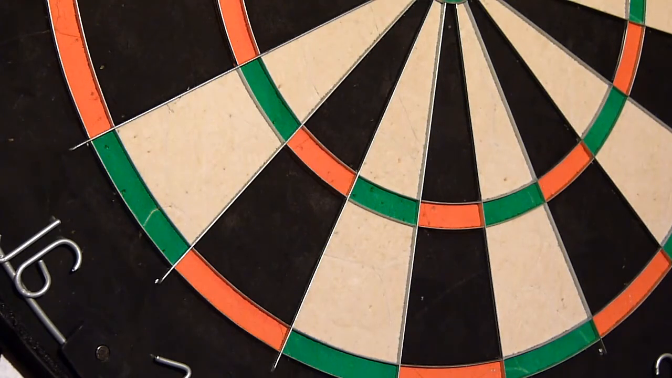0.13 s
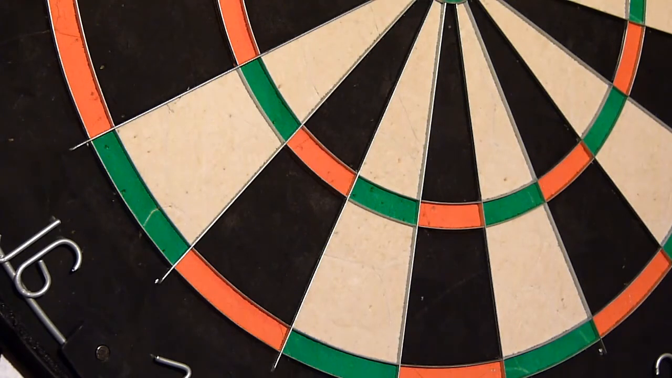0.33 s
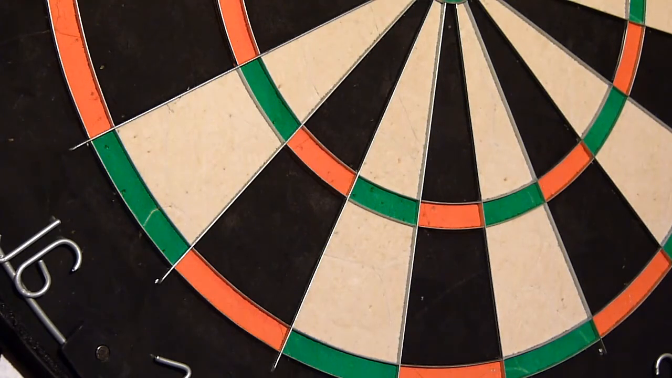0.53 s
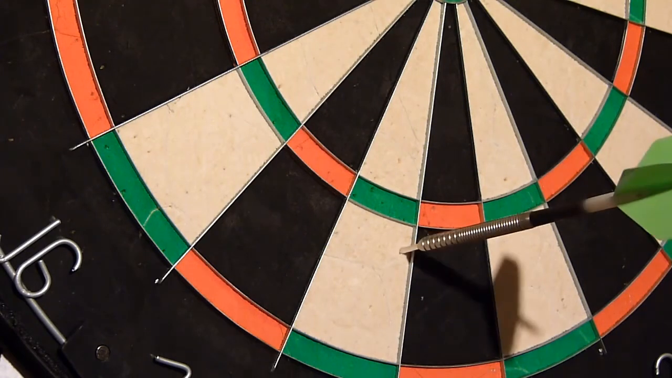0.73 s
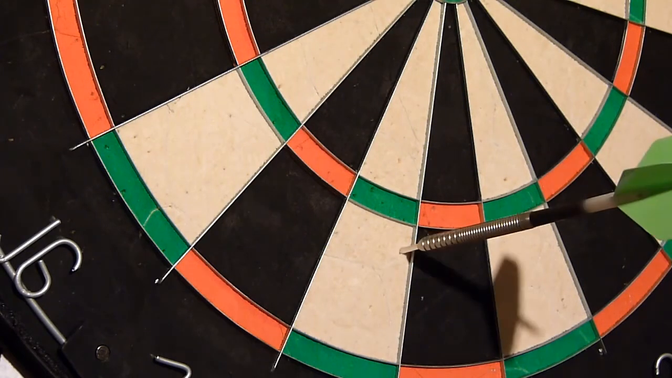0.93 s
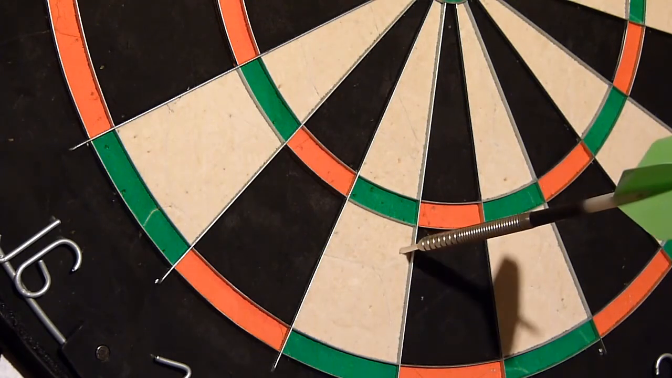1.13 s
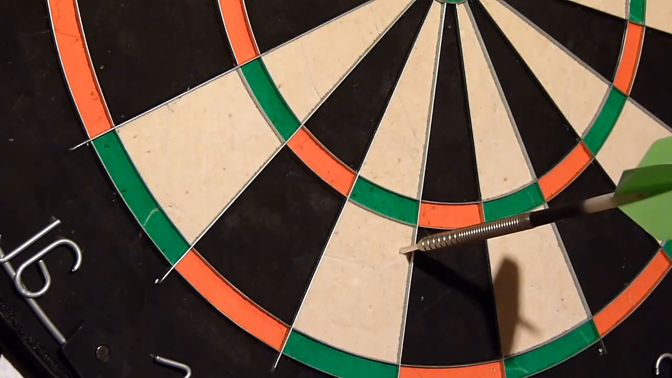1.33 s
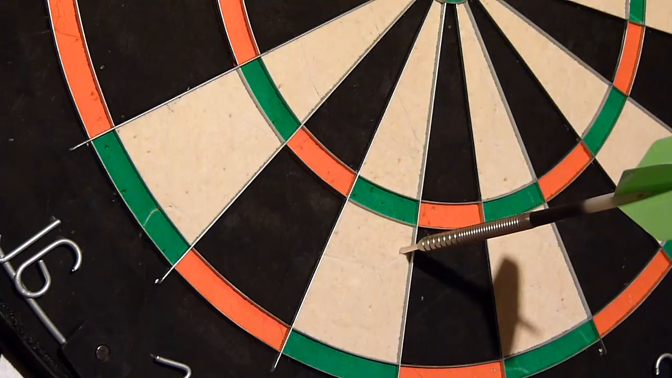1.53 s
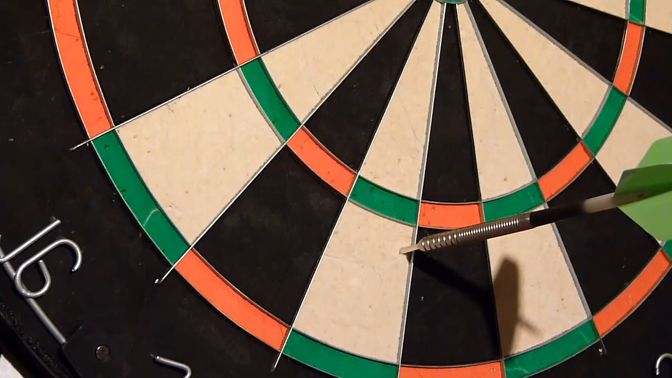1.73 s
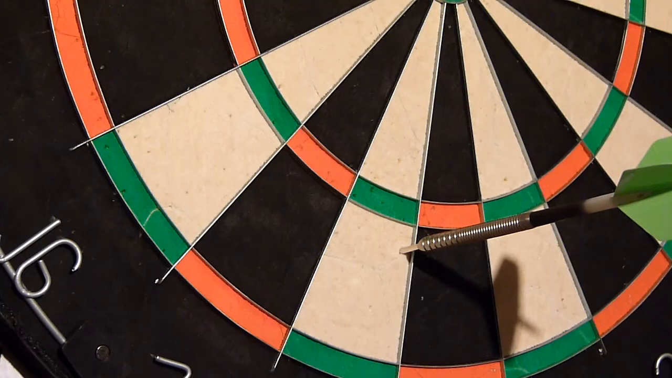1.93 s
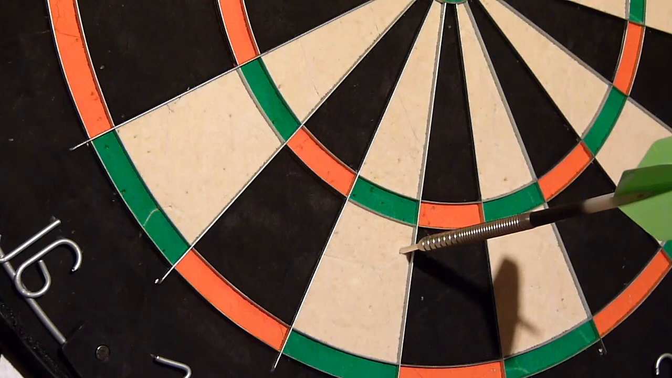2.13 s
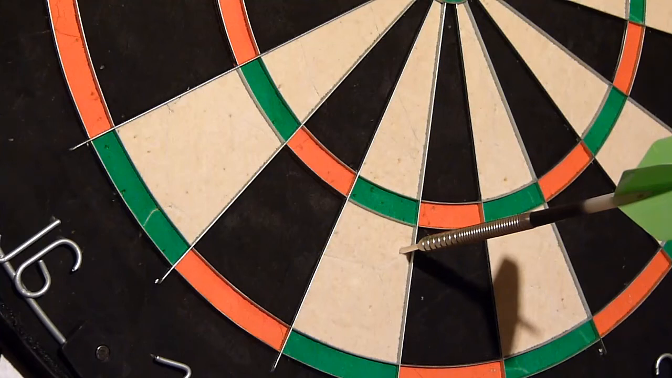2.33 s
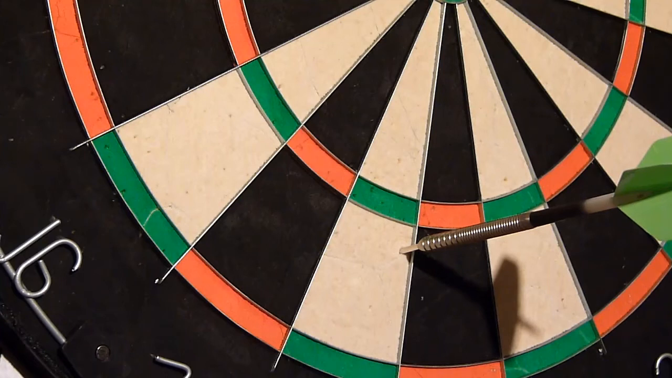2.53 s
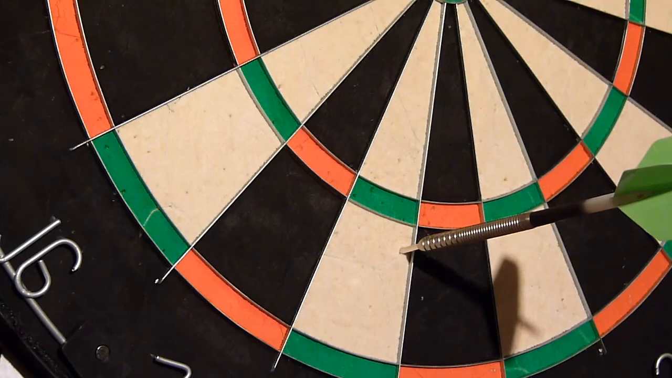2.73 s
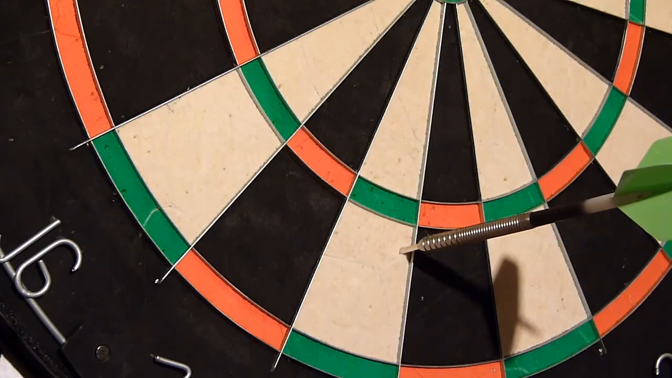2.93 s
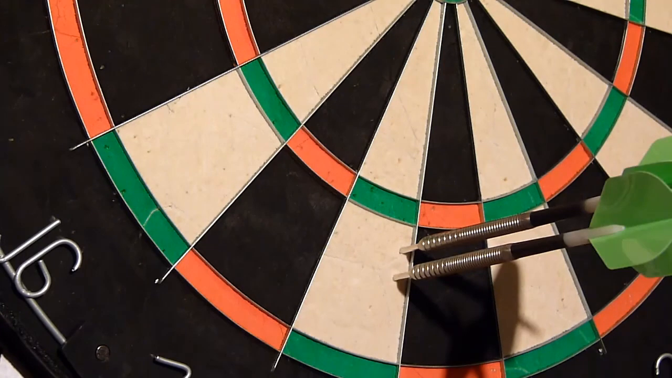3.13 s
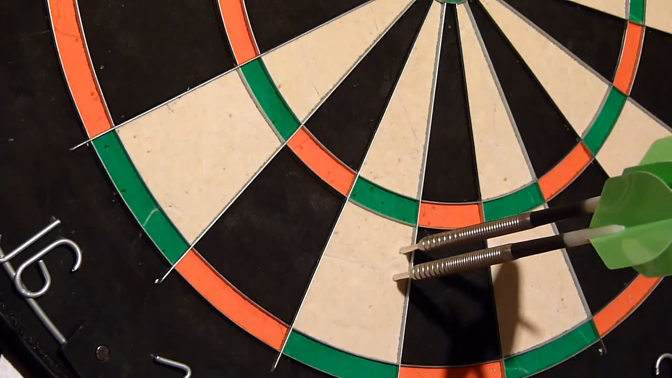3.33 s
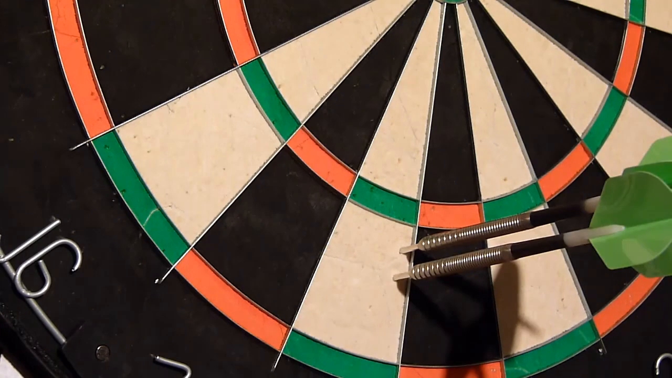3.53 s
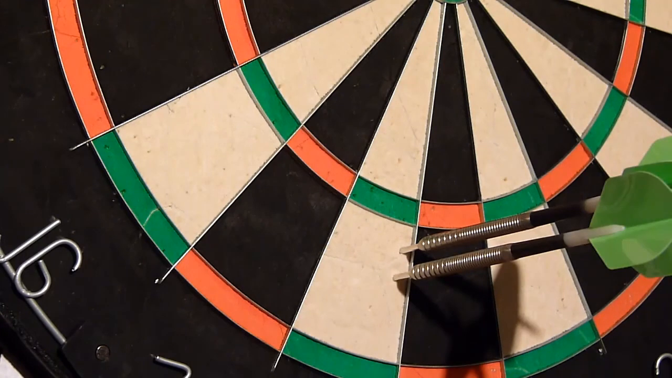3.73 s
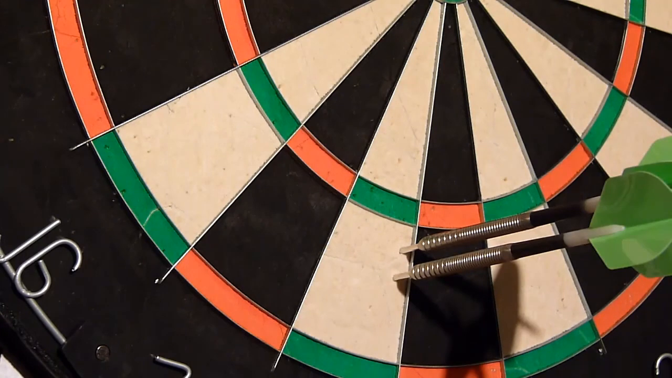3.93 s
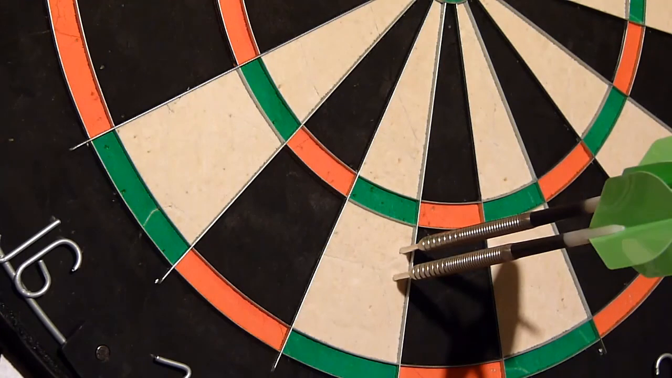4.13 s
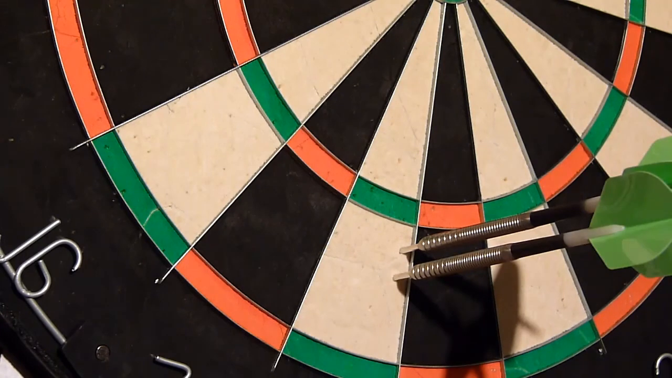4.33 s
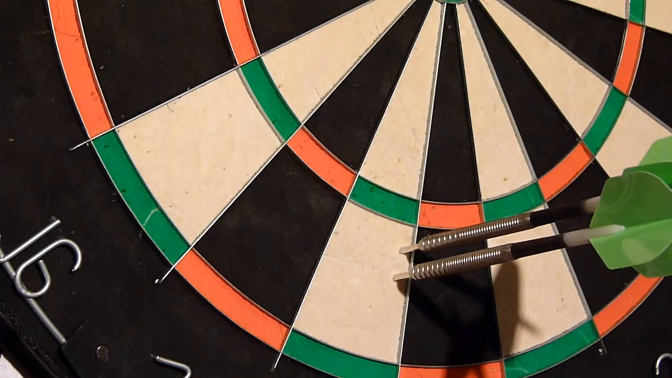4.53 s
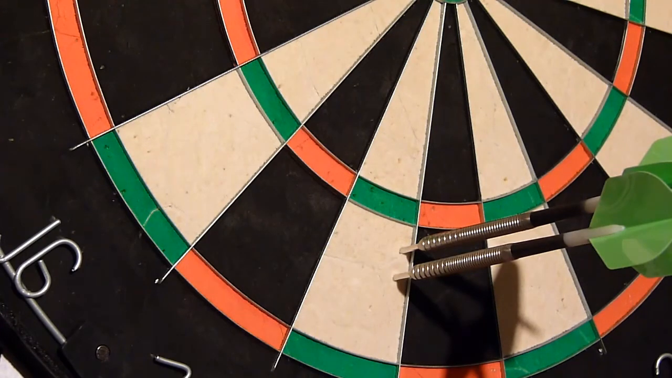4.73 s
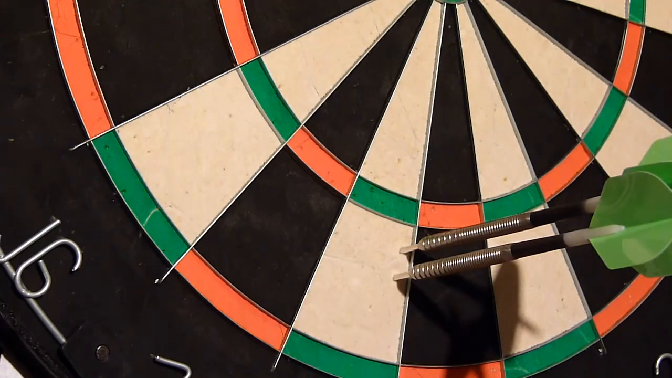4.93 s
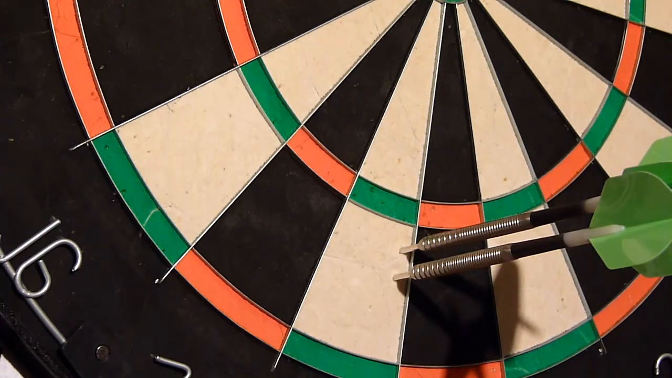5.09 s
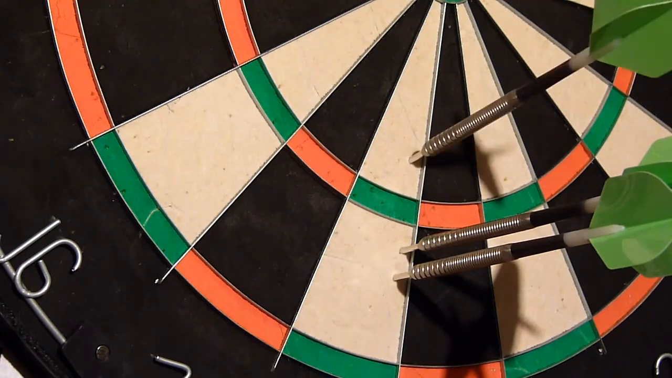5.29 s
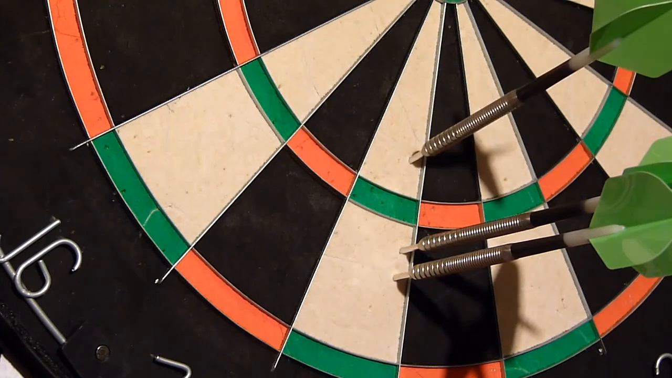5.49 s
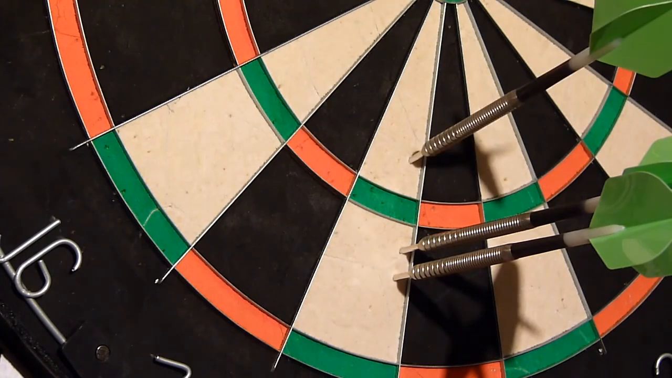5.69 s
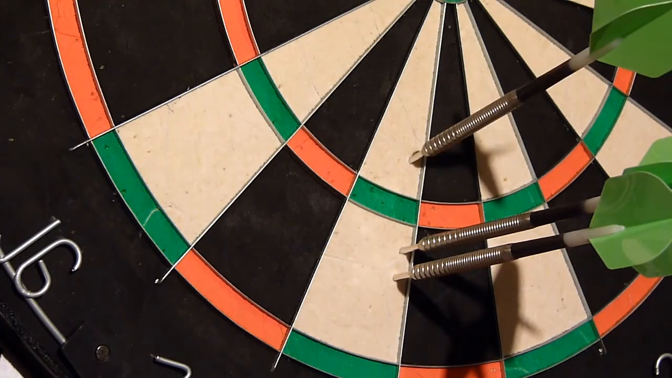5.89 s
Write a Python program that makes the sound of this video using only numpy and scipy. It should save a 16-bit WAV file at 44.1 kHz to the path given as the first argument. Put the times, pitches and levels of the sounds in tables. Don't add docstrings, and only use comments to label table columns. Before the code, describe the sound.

A quiet indoor room with a soft low fan hum. A faint flick precedes a loud, dry dart thud; a long pause follows, then a second dart scrapes the first with a bright metal clack and duller thud. The third hits sharply and cleanly. Behind, the thrower's clothes rustle, spare darts click, and a heel knocks and scuffs at the end. Close stereo, short room reverberation.

```python
import sys
import numpy as np
from scipy import signal
from scipy.fft import rfft, irfft
from scipy.io import wavfile

SR = 44100
rng = np.random.default_rng(int(sys.argv[2]) if len(sys.argv) > 2 else 0)


def file_out(sig):
    cols = np.atleast_2d(sig).T
    lim = np.clip(cols, -1, 1)
    pcm = np.round(lim * 32767).astype(np.int16)
    wavfile.write(sys.argv[1], SR, pcm)


def volts_from_decibels(level):
    exponent = np.asarray(level, float) / 20
    return 10 ** exponent


N = 262483

# f/Hz, level/dB per Hz
AIR = [(15, -63.5), (25, -38), (87, -22.5), (114, -13), (166, -10), (180, -14.5), (200, -1), (270, -9),
       (427, -6.5), (1070, -14.5), (1330, -16.5), (2610, -25), (11600, -30.5), (14700, -31), (15600, -55)]
# f/Hz, width/Hz, level/dB
FAN = [(200.7, 20, -56.5), (225.3, 13.4, -64), (756.8, 14, -64.5), (1337, 43, -66)]
# f/Hz, level/dB
WHINE = [(120.0, -67.5), (10080, -88.5), (11520, -77), (12958, -82), (14400, -82), (14998, -80)]
# f/Hz, likeness
AIR_LIKENESS = [(60, 0.98), (180, 1), (550, 0.96), (1650, 0.27), (4970, -0.33), (15000, -0.17)]
# top t/s, level/dB
WEIGHT_SHIFTS = [(.46, -69), (.68, -48.5), (1.72, -67), (2.85, -65), (3.14, -52.5), (5.0, -66), (5.32, -53),
                 (5.56, -66), (5.88, -51)]
# f/Hz, likeness
ROOM_LIKENESS = [(60, 1.0), (180, 1.0), (550, 0.97), (1650, 0.61), (4970, 0.19), (15000, 0.0)]
# f/Hz, level/dB, t60/s
ROOM = [(297, -19.5, 0.65), (700, -20, 0.35), (1730, -23.5, 0.31), (4800, -24, 0.35), (9280, -23, 0.27),
        (14000, -21, 0.21)]
# top t/s, level/dB, length/s, grain f/Hz
RUBS = [(0.378, -59, 0.041, 8000), (0.439, -50.5, 0.15, 794), (0.427, -59, 0.14, 6000),
        (0.587, -55, 0.045, 7000), (0.836, -48.5, 0.084, 13100), (1.473, -60.5, 0.16, 14000),
        (1.8, -66, .2, 6000), (2.752, -63.5, 0.12, 7000), (2.826, -56.5, 0.081, 1290),
        (2.907, -64.5, 0.26, 7000), (5.009, -57, 0.085, 7000), (5.051, -47.5, 0.071, 1780),
        (5.404, -50, 0.14, 3000), (5.556, -47.5, 0.048, 902), (5.606, -52.5, .1, 3000),
        (5.669, -43, 0.24, 700), (5.681, -43, 0.16, 3020), (5.786, -49, .13, 8100),
        (5.804, -48.5, 0.13, 1470), (5.919, -45.5, 0.18, 1480), (5.945, -37, 0.034, 6000)]
# low f/Hz, high f/Hz
GRAIN_BANDS = [(200, 1340), (1500, 6100), (4500, 12800)]
# t/s, level/dB, f/Hz, t60/s
TAPS = [(.404, -43, 2500, 0.026), (.415, -50.5, 2740, 0.018), (.452, -36, 496, 0.0075),
        (.503, -51, 5500, 0.014), (.578, -45, 4940, 0.0053), (.58, -42, 6030, 0.0072),
        (1.8, -55, 5300, .01), (1.86, -53, 5200, .01), (2.81, -46.5, 2500, 0.032),
        (5.0372, -36.5, 2560, .03), (5.042, -39, 2400, .015), (5.037, -41, 4800, .015),
        (5.049, -47.5, 4730, .015), (5.05, -44.5, 457, 0.01), (5.067, -45, 2670, .012),
        (5.546, -35, 724, 0.024), (5.552, -28, 544, 0.013), (5.576, -34.5, 470, 0.012),
        (5.62, -36.5, 278, 0.057), (5.668, -41, 330, .06), (5.712, -39.5, 284, 0.047),
        (5.935, -38.5, 375, 0.037), (5.81, -33.5, 2100, .008)]
# t/s, peak level/dB, length/s
FLICKS = [(0.277, -32.5, 0.016), (2.669, -32, 0.011), (4.8964, -30.5, 0.0082), (5.9304, -24, 0.0078)]
# f/Hz, level/dB per Hz
FINGERS = [(880, -42), (1500, -15.5), (2260, -9.5), (3340, -12), (10600, -13.5), (14100, -20), (15500, -30)]
# tip enters t/s, barrel stops t/s
LANDINGS = [
    (.6019, .60596),
    (2.9858, 2.9929),
    (5.2031, 5.20744),
]
# thump level/dB, tip nudge level/dB, knock level/dB
BLOWS = [
    (0.5, -17.5, -4.5),
    (-5, -27.5, -10.5),
    (-1.4, -20, -3.5),
]
# crackle level/dB, crackle length/s, level of its echo/dB
TIPS = [
    (-10, 0.0046, -10.5),
    (-9, 0.011, -24),
    (-16.5, 0.0065, -14),
]
# f/Hz, level/dB per Hz
FIBRES = [(1500, -7.5), (3700, -11.5), (5400, -8.5), (7000, -3.5), (10500, -1), (13000, -3), (16000, -15)]
# f/Hz, level/dB per Hz
CRACKLE_ALL_ROUND = [(880, -35), (1500, -28), (2340, -21.5), (3860, -19), (5300, -2.5), (6550, -14),
                     (10900, -9.5), (14300, -26), (15000, -55)]
# f/Hz, level/dB per Hz
CLACK_ALL_ROUND = [(700, -30.5), (1200, -3.5), (1820, -11.5), (2070, 3.5), (2650, -8.5), (3540, -6),
                   (4300, -5), (5370, -2.5), (9370, -8.5), (10800, -8), (15500, -20.5)]
# f/Hz, level/dB, t60/s
BARREL = [(2100, 0.5, 0.00766), (2500, 0.5, 0.013), (3900, 2, 0.0049), (4800, 1, 0.013),
          (5365, -0.5, 0.021), (6130, -3, .006), (7340, 4, 0.017), (8900, -0.5, 0.0059),
          (10610, 6.5, 0.0066), (12000, -6, 0.0092), (14000, 5, 0.0036)]
# t/s, level/dB, f/Hz, t60/s
DART_RINGS = [(2.9872, -12.5, 2100, 0.0076), (2.988, -42, 2170, 0.36), (2.988, -39, 2260, 0.22),
              (2.9915, -15, 225, .035), (2.99, -30, 1020, .1), (2.988, -18, 4950, .02),
              (5.2075, -46, 920, .12), (.606, -22.5, 920, 0.09), (.606, -29, 1300, 0.14),
              (.606, -22, 690, 0.14), (.606, -34, 1500, 0.082), (5.2075, -28.5, 1320, 0.21)]
# f/Hz, level/dB, t60/s
WALL = [(56.4, -50.5, 0.83), (85.1, -42, 0.623), (87.9, -63, 0.7), (122.7, -46, 0.42), (156.3, -34, 0.39),
        (185, -33.5, 0.63)]
# f/Hz, level/dB, t60/s, polarity of the mode at the microphone
BOARD = [(132.9, -21.4, 0.044, 1), (217.4, -24.1, 0.178, -1), (234.5, -28.1, 0.303, -1),
         (262.0, -8.0, 0.056, -1), (267.3, -21.4, 0.368, -1), (269.6, -21.5, 0.244, 1),
         (282.7, -20.1, 0.266, -1), (285.6, -22.9, 0.312, -1), (288.8, -21.4, 0.276, 1),
         (294.7, -23.1, 0.323, 1), (302.4, -22.8, 0.202, -1), (308.0, -16.6, 0.24, -1),
         (311.6, -25.9, 0.367, 1), (317.7, -11.5, 0.244, 1), (326.5, -6.2, 0.093, -1),
         (337.9, -28.9, 0.286, 1), (341.3, -22.6, 0.296, 1), (348.6, -16.8, 0.229, 1),
         (353.7, -19.9, 0.256, -1), (369.6, -17.1, 0.062, 1), (400.0, -23.7, 0.368, 1),
         (405.7, -25.0, 0.182, 1), (474.8, -27.9, 0.185, 1), (525.3, -28.7, 0.221, 1),
         (656.2, -20.5, 0.14, 1), (725.9, -27.6, 0.245, 1), (751.6, -10.6, 0.015, 1),
         (872.3, -29.4, 0.189, 1)]

CLACK_S = 2.9856


def rms_one(x):
    return x / np.sqrt(np.mean(x ** 2) + 1e-30)


def at_hz(points, hz, axis=1):
    points = np.array(points)
    return np.interp(np.log(hz), np.log(points[:, 0]), points[:, axis])


def colour(x, spectrum):
    gain = volts_from_decibels(at_hz(spectrum, np.fft.rfftfreq(N, 1 / SR) + 1))
    return irfft(rfft(x) * gain, N)


def band(x, low_hz, high_hz):
    return signal.sosfilt(signal.butter(2, [low_hz, high_hz], "band", fs=SR, output="sos"), x)


def high_pass(x, hz):
    return signal.sosfilt(signal.butter(2, hz, "high", fs=SR, output="sos"), x)


def low_pass(x, hz, order):
    return signal.sosfilt(signal.butter(order, hz, fs=SR, output="sos"), x)


def pair(likeness, size):
    mid, side = rfft(rng.standard_normal((2, size)))
    alike = np.clip(at_hz(likeness, np.fft.rfftfreq(size, 1 / SR) + 1), -1, 1)
    common = np.sqrt(.5 + alike / 2) * mid
    opposed = np.sqrt(.5 - alike / 2) * side * [[1], [-1]]
    return irfft(common + opposed, size)


def ring(clicks, hz, t60):
    r = volts_from_decibels(-60 / (t60 * SR))
    w = 2 * np.pi * hz / SR
    return signal.lfilter([0, np.sin(w)], [1, -2 * r * np.cos(w), r * r], clicks + 1e-18)


def strike(times, levels_db):
    clicks = np.zeros(N)
    clicks[np.round(np.array(times) * SR).astype(int)] = volts_from_decibels(levels_db)
    return clicks


def burst(start, level_db, length, per_s, lean):
    size = int(length * SR)
    chance, height, sign = rng.random((3, size))
    grains = (chance < per_s / SR) * -np.log(height + 1e-3) * np.sign(sign - .5)
    swell = np.sin(np.pi * np.linspace(0, 1, size) ** lean)
    out = np.zeros(N)
    out[round(start * SR):][:size] = volts_from_decibels(level_db) * grains * swell
    return out


def weight(t):
    rise, fall = 94.5, 71
    shifts = (volts_from_decibels(db - np.maximum(rise * (s - t), fall * (t - s))) for s, db in WEIGHT_SHIFTS)
    return volts_from_decibels(-79) + sum(shifts)


def air():
    t = np.arange(N) / SR
    out = volts_from_decibels(-51) * rms_one(colour(pair(AIR_LIKENESS, N), AIR))
    for hz, width, db in FAN:
        out = out + volts_from_decibels(db) * rms_one(band(pair(AIR_LIKENESS, N), hz - width / 2, hz + width / 2))
    for hz, db in WHINE:
        out = out + volts_from_decibels(db + 1.0) * np.sin(2 * np.pi * hz * t)
    rumble = rms_one(band(band(rng.standard_normal(N), 28, 93.5), 29, 95))
    return out + volts_from_decibels(-4) * weight(t) * rumble


def room(x):
    size = SR // 2
    t, echoes = np.arange(size) / SR, 0
    white = pair(ROOM_LIKENESS, size), pair(ROOM_LIKENESS, size)
    for k, hz in enumerate(180 * 2 ** np.arange(0, 6.6, .5)):
        fade = volts_from_decibels(at_hz(ROOM, hz) - 60 * t / at_hz(ROOM, hz, axis=2))
        echoes = echoes + fade * band(white[k % 2], hz / 1.19, hz * 1.19)
    onset_s = 0.0024
    echoes = echoes * np.clip(t / onset_s, 0, 1) ** 2
    return signal.fftconvolve(x[None], echoes, axes=1)[:, :N]


def rustle(rough_db):
    t, out = np.arange(N) / SR, np.zeros((2, N))
    rise_share, edge_db = 0.4, 12.5
    swells = []
    for s, db, length, _ in RUBS:
        flank_s = length * np.where(t < s, rise_share, 1 - rise_share)
        swells.append(volts_from_decibels(db - edge_db * ((t - s) / flank_s) ** 2))
    for low_hz, high_hz in GRAIN_BANDS:
        lumps = rms_one(band(rng.standard_normal(N), 24.6, 330))
        grains = rms_one(band(pair(ROOM_LIKENESS, N) * volts_from_decibels(rough_db * lumps), low_hz, high_hz))
        octaves = [np.log2(row[3] / np.sqrt(low_hz * high_hz)) for row in RUBS]
        out += grains * sum(volts_from_decibels(-3 * off ** 2) * swell for off, swell in zip(octaves, swells))
    return out


def taps(rows):
    return sum(ring(strike([s], [db]), hz, t60) for s, db, hz, t60 in rows)


def flicks():
    peels = sum(burst(s, db + 6.5, length, per_s=2600, lean=0.33) for s, db, length in FLICKS)
    return colour(peels, FINGERS)


def all_round():
    tips = colour(strike([at[0] for at in LANDINGS], [tip[2] + 14 for tip in TIPS]), CRACKLE_ALL_ROUND)
    barrels = colour(strike([CLACK_S], [14]), CLACK_ALL_ROUND)
    fingers = colour(strike([f[0] for f in FLICKS], [f[1] + 27 for f in FLICKS]), FINGERS)
    return tips + barrels + fingers


def clack():
    touches = burst(CLACK_S, -14.5, 0.005, per_s=5400, lean=0.73)
    modes = enumerate(BARREL)
    return sum((-1) ** k * volts_from_decibels(db - 8.0) * ring(touches, hz, t60) for k, (hz, db, t60) in modes)


def crackle():
    snaps = sum(burst(enters, db, length, per_s=17000, lean=1.3)
                for (enters, _), (db, length, _) in zip(LANDINGS, TIPS))
    return colour(snaps, FIBRES)


def knock():
    click = strike([at[1] for at in LANDINGS], [blow[2] for blow in BLOWS])
    return volts_from_decibels(16) * band(low_pass(click, 1100, order=1), 524, 2610)


def board():
    enters, stops = np.transpose(LANDINGS)
    thump_db, nudge_db, knock_db = np.transpose(BLOWS)
    blow, nudge = strike(stops, thump_db), strike(enters, nudge_db)
    edge = strike(stops, knock_db + 3)
    lean = volts_from_decibels(0.3 * rng.standard_normal((len(BOARD), 1, 1)) * [[1], [-1]])
    out = 0
    for pan, (hz, db, t60, sign) in zip(lean, BOARD):
        out = out + pan * sign * volts_from_decibels(db) * ring(blow if hz < 600 else edge, hz, t60)
    out = out + sum(volts_from_decibels(db) * ring(blow, hz, t60) for hz, db, t60 in WALL)
    out = out - volts_from_decibels(-12) * ring(edge, 1300, 0.0091)
    out = out - ring(nudge, 340, 0.057) - volts_from_decibels(2.5) * ring(nudge, 700, 0.009)
    return high_pass(out, 58)


def scene():
    wood = board() + volts_from_decibels(-2.5) * knock()
    darts = crackle() + clack() + taps(DART_RINGS)
    near = wood + high_pass(darts, 60)
    near[0] = np.roll(near[0], 1)
    touches = taps(TAPS)
    wet = room(knock() + all_round() + volts_from_decibels(-8) * touches)
    far = low_pass(wet + rustle(rough_db=2.6), 14600, order=8)
    return near + flicks() + volts_from_decibels(0.5) * touches + far + air()


def roll_off(x):
    return signal.sosfilt(signal.butter(12, 16480, fs=SR, output="sos"), x)


def record(dry):
    mix = low_pass(dry, 15800, order=6)
    return roll_off(mix)


dry = scene()
out = record(dry)
file_out(out)
```